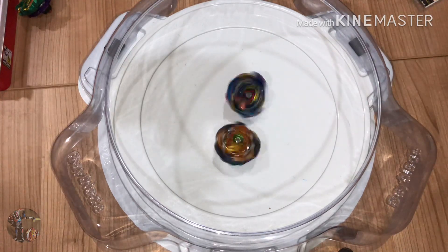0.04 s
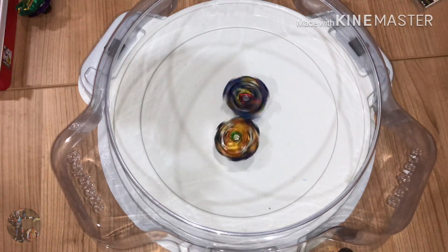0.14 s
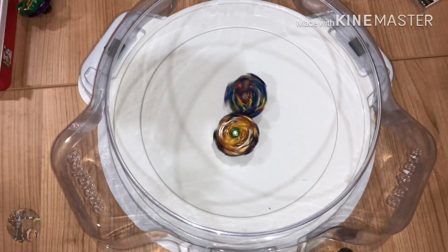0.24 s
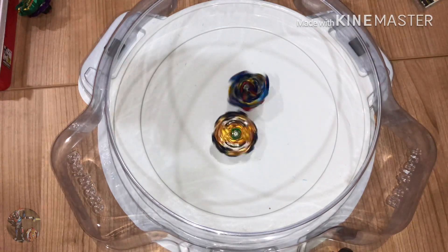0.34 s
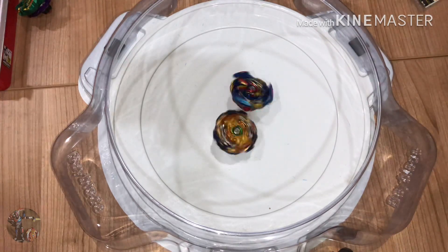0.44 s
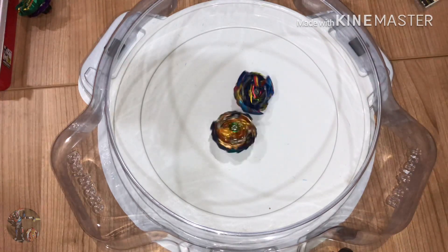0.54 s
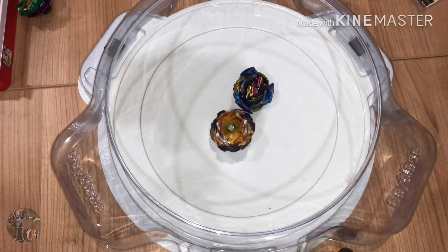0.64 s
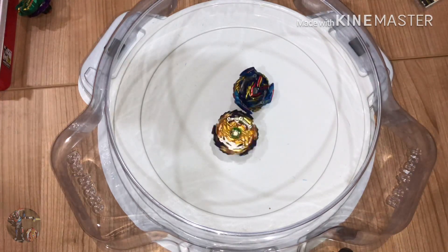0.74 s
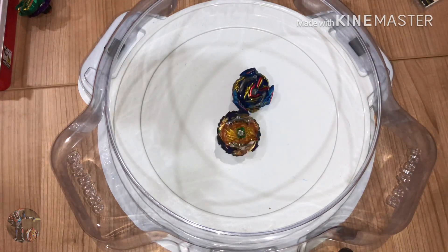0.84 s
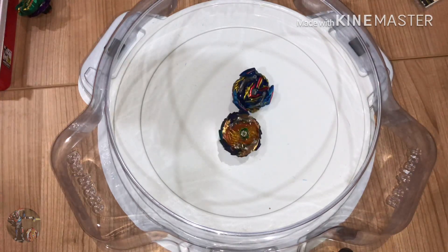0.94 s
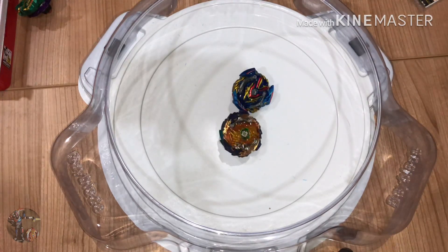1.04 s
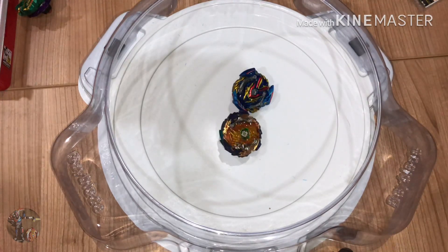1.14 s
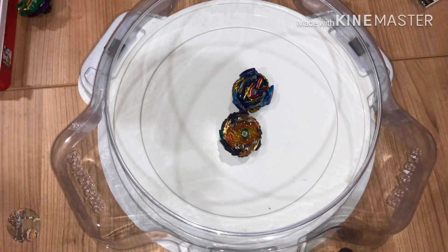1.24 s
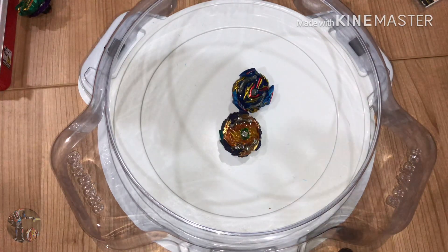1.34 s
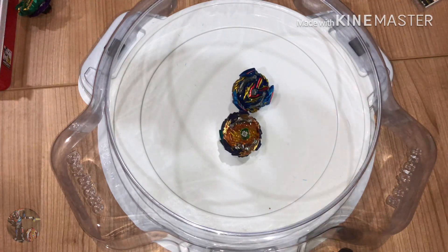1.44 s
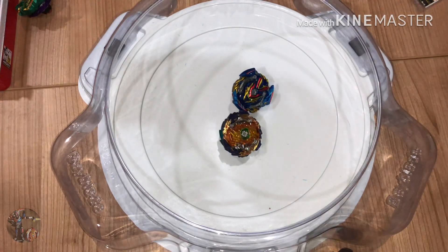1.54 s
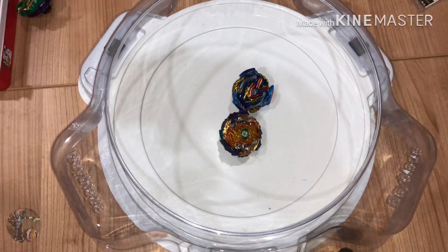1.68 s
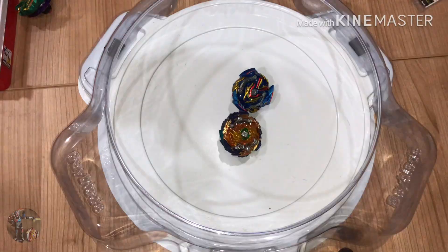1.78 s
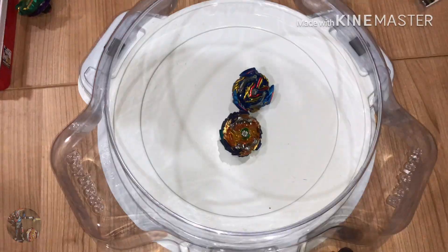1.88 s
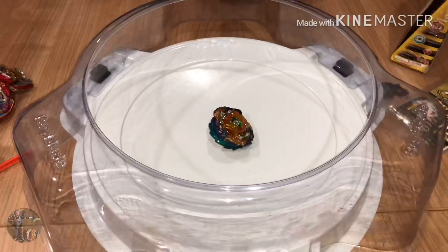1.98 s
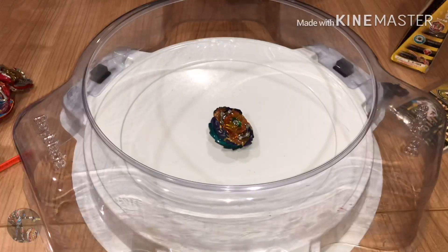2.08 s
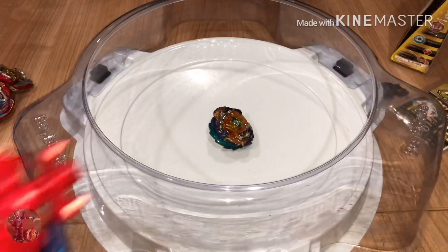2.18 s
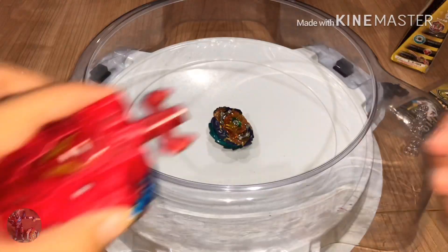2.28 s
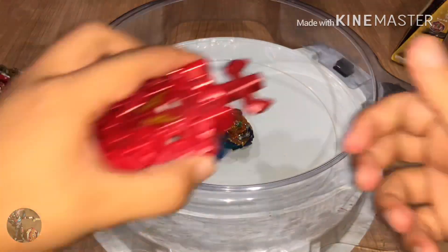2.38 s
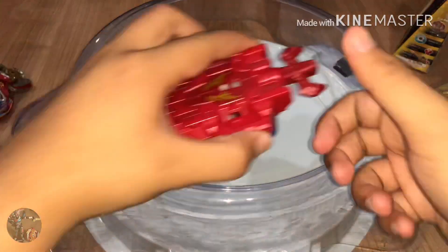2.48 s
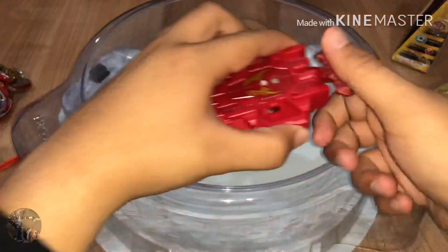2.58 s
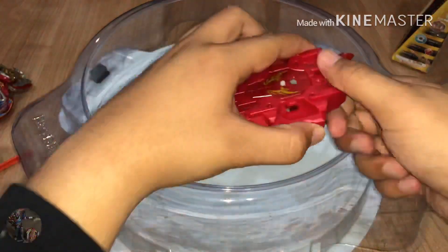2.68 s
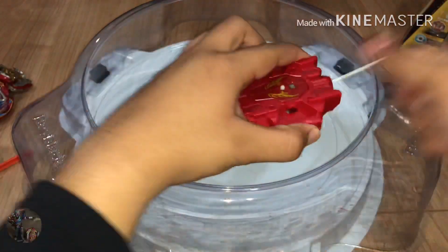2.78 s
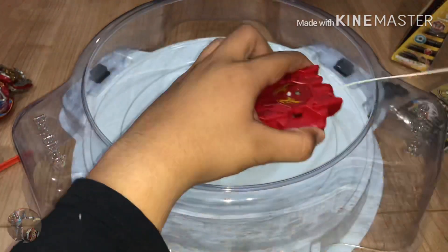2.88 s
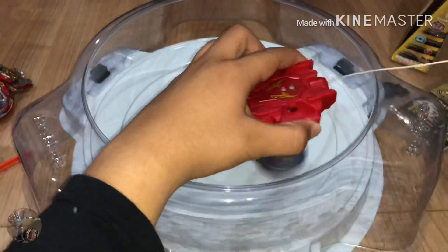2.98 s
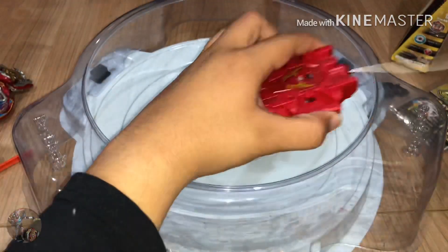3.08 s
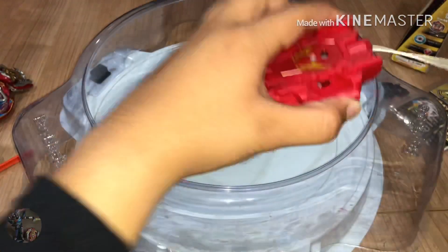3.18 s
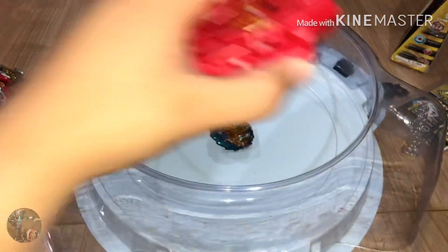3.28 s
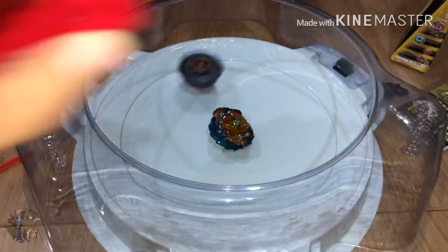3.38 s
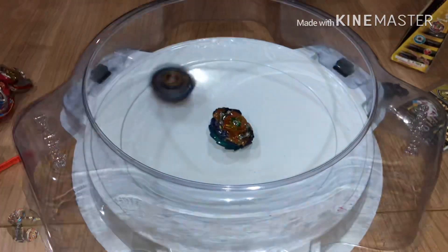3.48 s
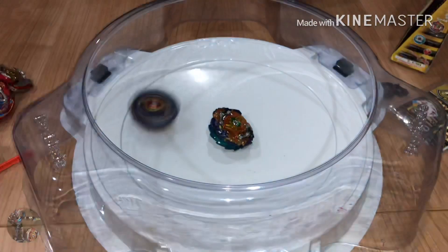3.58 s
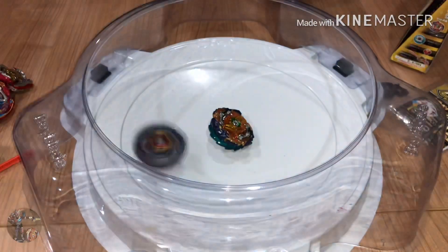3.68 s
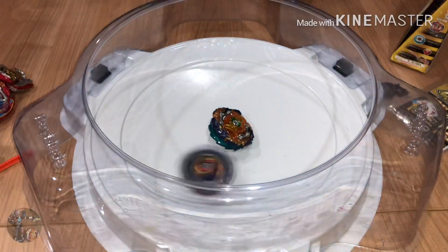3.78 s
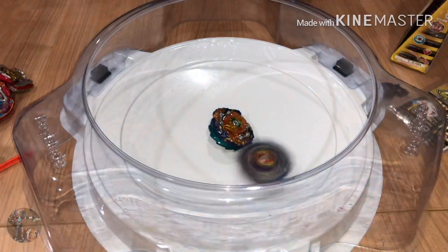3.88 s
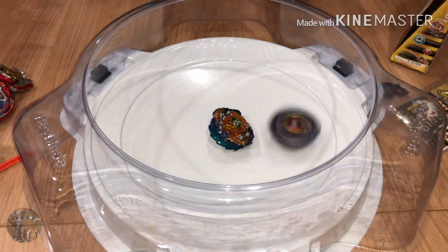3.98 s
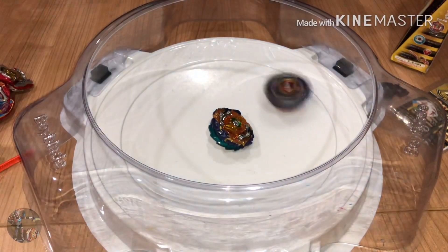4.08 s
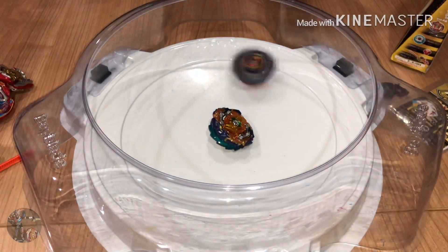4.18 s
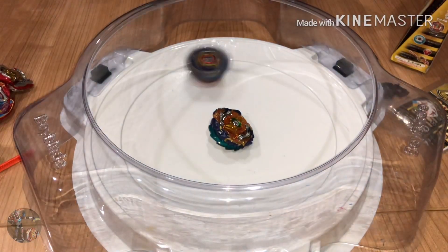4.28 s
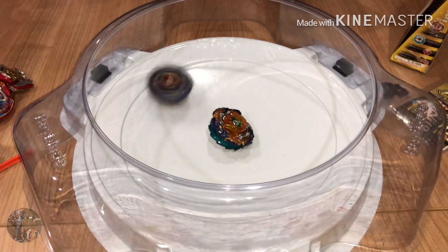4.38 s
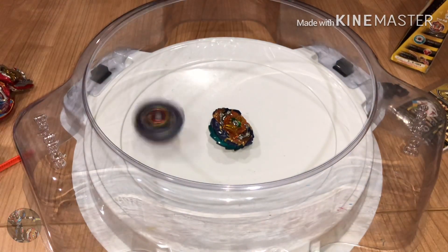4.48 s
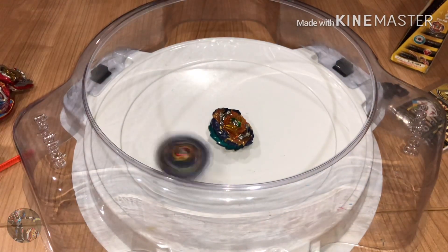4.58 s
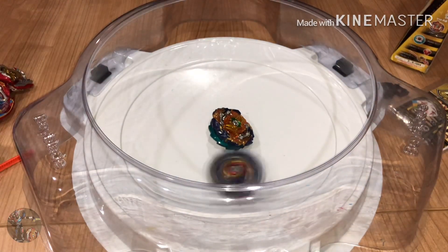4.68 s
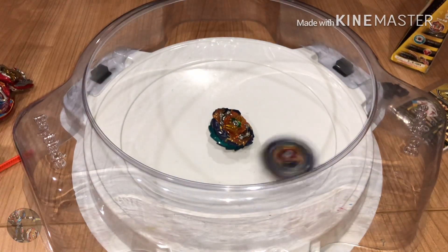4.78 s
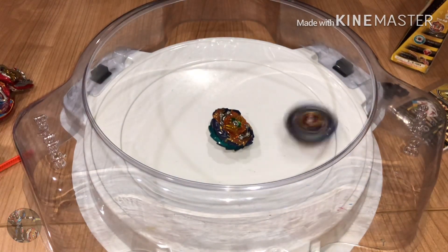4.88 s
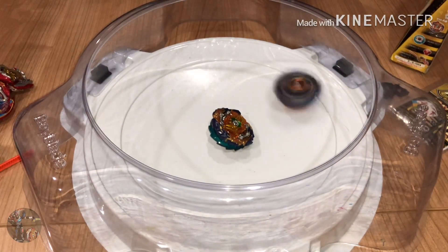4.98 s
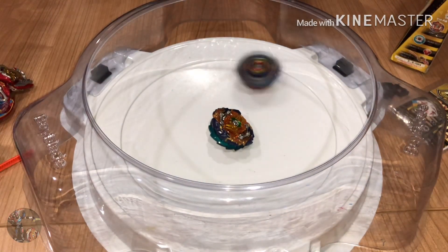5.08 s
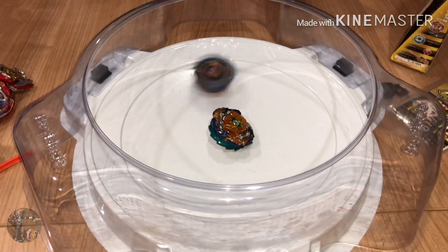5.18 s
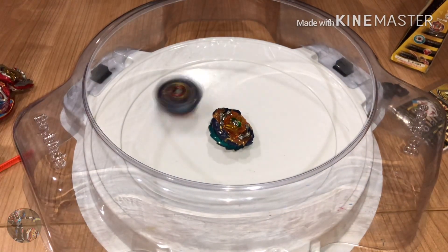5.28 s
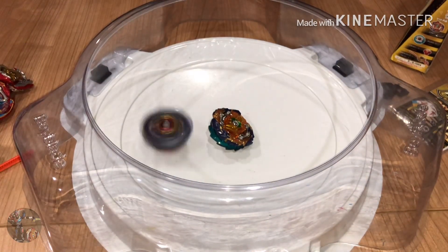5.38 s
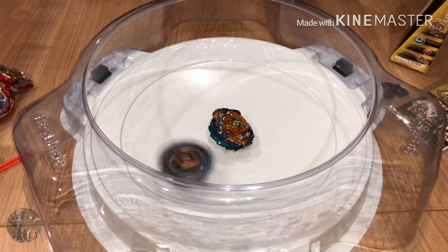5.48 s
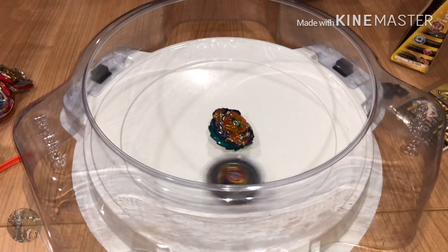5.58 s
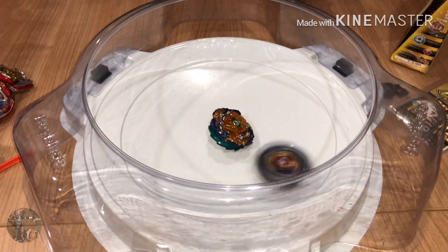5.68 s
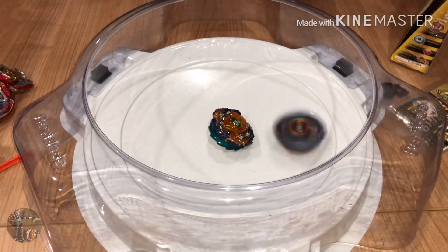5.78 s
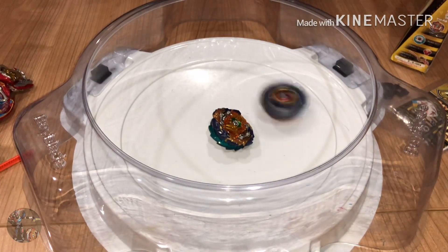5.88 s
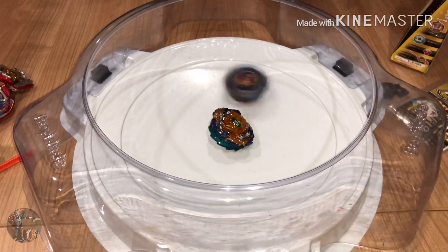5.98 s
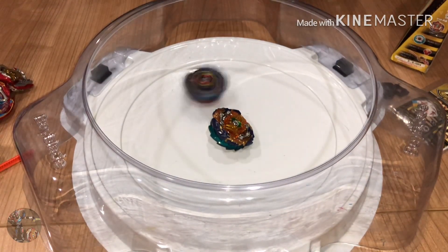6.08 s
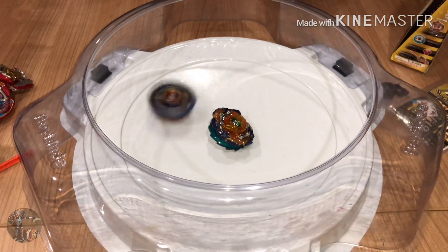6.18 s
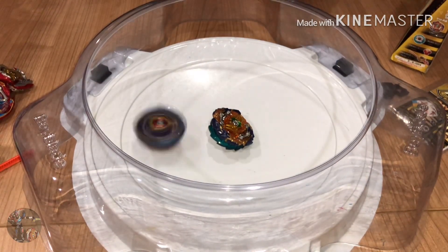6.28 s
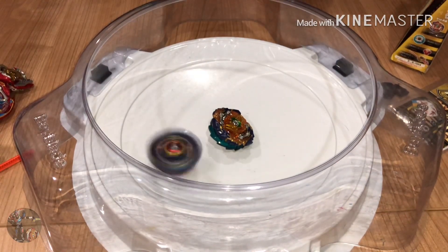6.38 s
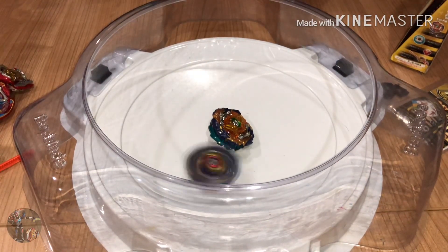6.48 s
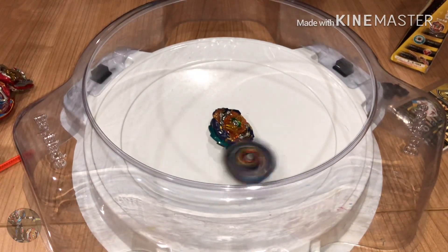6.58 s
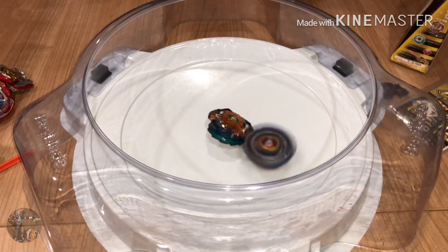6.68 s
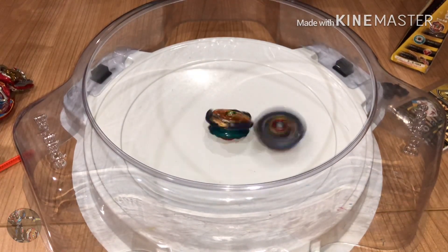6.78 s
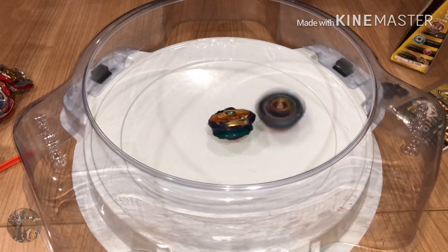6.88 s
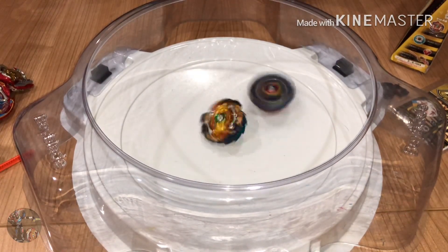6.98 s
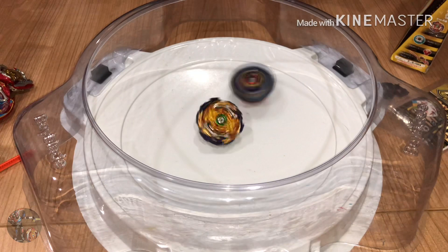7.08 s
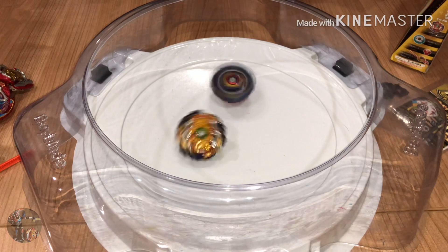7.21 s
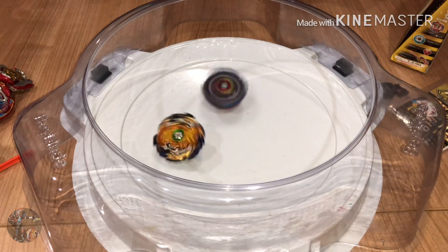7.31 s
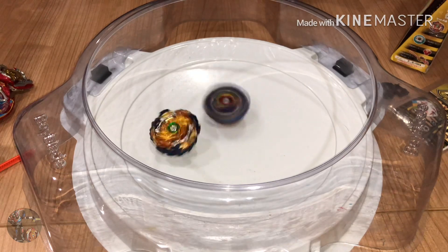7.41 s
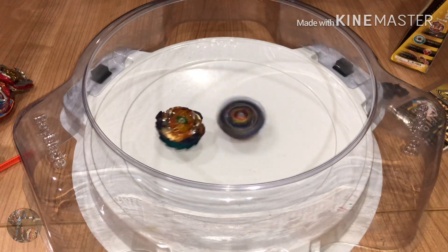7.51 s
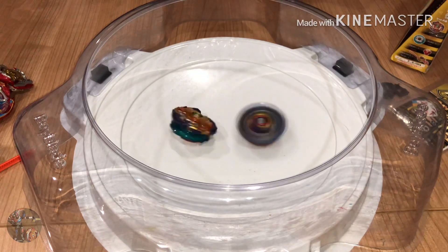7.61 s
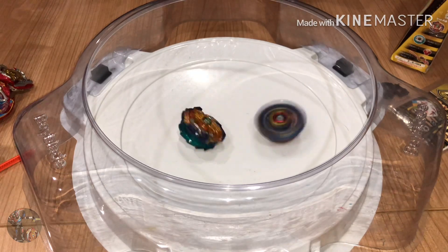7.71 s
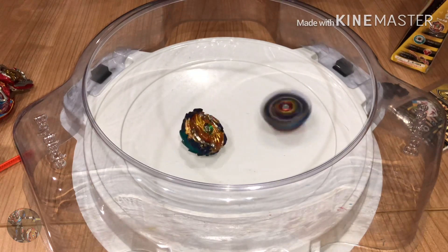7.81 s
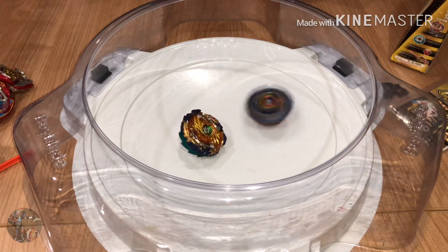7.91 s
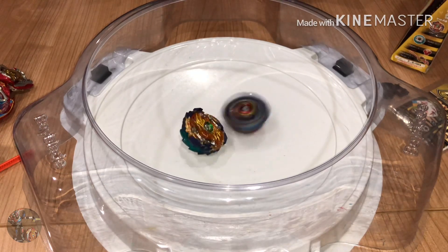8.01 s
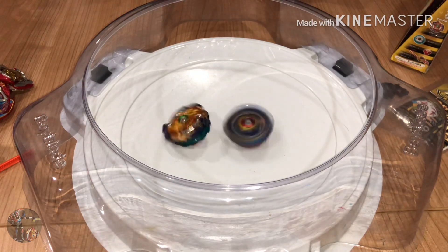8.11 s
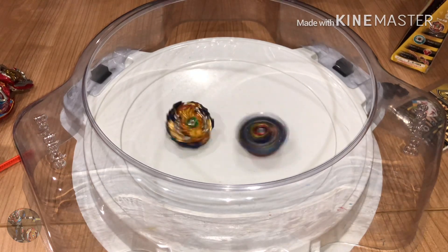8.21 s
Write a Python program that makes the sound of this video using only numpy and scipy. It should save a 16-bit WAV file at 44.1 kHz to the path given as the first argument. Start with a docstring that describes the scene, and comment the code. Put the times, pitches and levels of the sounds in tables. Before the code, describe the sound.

Close microphone, small hard plastic arena under a clear dome. Dull clacks and rim rattle fade to stillness, with a short near-total gap. A toothed cord zips harshly through a launcher, then rattles back while a top bounces down. It drones round the bowl, grinding and swelling each lap, before bright metallic clashes, knocks and rolling rumble end the scene.

```python
"""Toy spinning tops in a plastic bowl under a clear dome, heard from close above.
Two tired tops clatter and roll to rest: blows excite dense noise modes and clear ringing modes.
After a short silence a ripcord launcher whirrs: tooth snaps drive coloured noise bursts.
A new top bounces in and circles: its spin sets a hum, and each turn of the tip drums, grinds and scrapes.
It then clashes with the top lying in the middle, over rolling rumble, rattle and quiet room noise."""
import sys
import numpy as np
from scipy import signal
from scipy.fft import rfft, irfft, next_fast_len
from scipy.io import wavfile
from scipy.ndimage import map_coordinates

SR = 44100
rng = np.random.default_rng(int(sys.argv[2]) if len(sys.argv) > 2 else 0)


def unload_audio(sound):
    """Save the sound as a 16-bit wav file, at the path given as the first command line argument."""
    columns = np.transpose(np.atleast_2d(sound))
    # keep every value between -1 and 1, then stretch to whole-number steps
    steps = np.round(np.clip(columns, -1, 1) * 32767)
    wavfile.write(sys.argv[1], SR, steps.astype(np.int16))


N = 363825
TIME = np.arange(N) / SR

# Spectra of the parts of a blow: f/Hz, relative density/dB
CRACK_SPECTRUM = [(1060, -40), (1800, -5.5), (2520, -11), (3510, 3), (4060, -3), (4880, -3), (6470, -1),
                  (8060, -1.5), (10000, -6), (14900, -8.5), (16000, -18)]
KNOCK_SPECTRUM = [(380, -29.5), (650, -11.5), (1190, -0.5), (1370, -10.5), (1540, -3.5), (1790, -6),
                  (2380, -7), (3000, -7), (3900, -32), (6600, -120)]
THUD_SPECTRUM = [(41, -42), (70, -17), (224, -5.5), (371, 1.5), (575, -2.5), (792, -10), (900, -18.5),
                 (1170, -41.5), (1980, -120)]
TAIL_SPECTRUM = [(65, -46), (110, -8.5), (346, -13), (392, -6), (426, -15.5), (703, -19.5), (1040, -6),
                 (1400, -20.5), (1520, -13), (2350, -13.5), (2560, -16), (3800, -17.5), (8390, -15.5),
                 (15000, -25), (16000, -33.5)]
# Ringing modes of bowl and tops: f/Hz, relative level/dB, t60/s
BODY_MODES = [(394.2, 2, 0.55), (449, -1, 0.37), (1160, -8, .3), (1624, -8, 0.27), (2050, -6, 0.48),
              (2560, -12.5, .26), (2660, -6, .26), (3100, -3.5, .35), (3600, -11, .35), (4420, -8.5, .29),
              (5700, -8, .35), (6250, -10.5, .32), (6900, -7.5, .3), (7700, -10, 0.23), (8265, -11.5, 0.39),
              (10950, -12, 0.23)]
# Tops striking each other: t/s, rim crack level/dB, jolt passed to the bowl level/dB
CLASHES = [(0.001, -25, -29.5), (0.0678, -15.5, -28.5), (0.13, -23, -33), (0.1858, -27, -32),
           (0.206, -25.5, -36), (0.33, -18, -29.5), (0.3812, -22.5, -34.5), (0.441, -24.5, -33),
           (0.4728, -29, -42), (0.6538, -28, -36), (0.6972, -28, -45), (0.7809, -43, -61),
           (0.8056, -37.5, -56), (0.9239, -40, -58), (6.7221, -24.5, -49), (6.7423, -27, -36),
           (6.7539, -14, -31), (6.7858, -28, -33), (6.845, -21.5, -20.5), (6.8516, -9.5, -20.5),
           (7.0083, -33, -46), (7.031, -13, -28), (7.076, -11.5, -20), (7.2858, -7.5, -16.5),
           (7.583, -34, -50), (7.594, -34, -54), (7.707, -32, -39), (7.76, -39, -47), (8.1726, -7, -16)]
# Tumbling top knocking on plastic: t/s, level/dB, pitch of the spot hit f/Hz
KNOCKS = [(0.286, -31.5, 1100), (0.332, -28, 1110), (0.349, -35, 933), (0.699, -36, 1180),
          (0.807, -43, 1026), (0.922, -42, 1110), (1.0069, -46.5, 1470), (1.0905, -47, 2650),
          (1.108, -47, 2470), (6.883, -26, 2080), (6.91, -30, 1130), (7.056, -32, 930),
          (7.131, -26.5, 1590), (7.314, -20.5, 2560), (7.338, -23, 1210), (7.359, -23.5, 1510),
          (7.384, -27, 1018), (7.465, -32, 2170), (7.5708, -34, 1230), (7.586, -32, 1193),
          (7.695, -28, 2490), (7.709, -25, 2400), (7.7363, -32, 2440), (7.819, -34, 1125),
          (7.8691, -34, 2620), (7.951, -35.5, 1210), (8.1094, -33.5, 880), (8.175, -15, 2640),
          (8.186, -16.5, 2090)]
# Launched top landing and bouncing ever lower: t/s, level/dB
BOUNCES = [(3.094, -7), (3.274, -9.5), (3.4218, -9.5), (3.5371, -13), (3.614, -16.5), (3.6696, -20.5),
           (3.711, -22.5), (3.7391, -33.5)]
# Catch and pawl of the launcher: t/s, level/dB, pitch f/Hz
CLICKS = [(2.373, -47, 2320), (2.7632, -55, 1300), (3.1747, -22, 4100), (3.228, -16, 3600),
          (3.3417, -14, 3900), (3.349, -13, 3150), (3.3744, -10, 3930), (3.507, -14, 3570)]
# Parts set off by each contact, against its strength: crack/dB, shell knock/dB, bowl thud/dB, tail/dB
KNOCK_PARTS_DB = (-10, 0, -2.5, -11)
BOUNCE_PARTS_DB = (-2, -5.5, 0.5, -14.5)
SLAP_PARTS_DB = (-9, -10.5, -9, -21.5)
CLICK_PARTS_DB = (1.5, -10, -28, -27)
# Slow tops rolling on their rims, one list per round: t/s, relative rumble level/dB, relative rattle level/dB
ROLLING = [
    [(0.0, -35, -39.5), (0.48, -43, -36.5), (0.63, -53, -64), (0.75, -47, -47), (1.124, -58, -76),
     (1.94, -66, -88)],
    [(6.72, -42, -40), (6.92, -32.5, -46), (7.18, -44.5, -44), (7.346, -35.5, -42), (7.6, -43, -44),
     (7.734, -39, -37), (8.074, -44.5, -48), (8.25, -30, -31)],
]
# Rolling spectra: f/Hz, relative density/dB
RUMBLE_SPECTRUM = [(41, -37.5), (70, -5.5), (331, -2), (397, 0), (802, -15.5), (885, -3.5), (1030, -10),
                   (1210, -7), (1400, -20), (2520, -18), (3500, -25), (4550, -48.5), (7700, -120)]
RATTLE_SPECTRUM = [(880, -35.5), (1500, 4.5), (1870, -4), (2410, -7.5), (4330, -3.5), (6180, -6.5),
                   (7610, -20), (8400, -8.5), (8920, -23.5), (16000, -32)]
# Room noise and a faint narrow hiss: f/Hz, relative density/dB
ROOM_SPECTRUM = [(21, -40.5), (35, -5), (200, 0), (617, -14), (819, -13.5), (979, -16.5), (1270, -21.5),
                 (2340, -24.5), (5590, -30.5), (7230, -29), (9580, -34.5), (14800, -37), (16000, -33)]
WHINE_SPECTRUM = [(6600, -25.5), (7250, -3), (7900, -31)]
# Overall level, with the silence between the rounds: t/s, level/dB
PAUSE = [(1.86, -1.5), (1.945, -13), (1.955, -62), (2.012, -66), (2.02, -13), (2.08, -3.5)]
# Hands moving the launcher: t/s, relative rustle level/dB
HANDLING = [(2.05, -70), (2.16, -56.5), (2.32, -76), (2.4, -58), (2.72, -68.5), (2.82, -59)]
# Handling rustle, launcher housing on the pull, and as the cord runs back: f/Hz, relative density/dB
RUSTLE_SPECTRUM = [(130, -2), (260, 2), (600, -5), (2400, -5.5), (5000, -13.5), (15000, -19)]
PULL_SPECTRUM = [(600, -22.5), (900, -15), (1200, -6), (1600, -4), (2000, -6), (2400, -5.5), (2850, -10.5),
                 (3500, -0.5), (4800, -11.5), (6300, -7), (7500, -11.5), (10000, -14.5), (15500, -22.5)]
RECOIL_SPECTRUM = [(600, -35), (1100, -8), (1600, -1), (2700, -7.5), (3300, -2.5), (3800, -0.5),
                   (4700, -8.5), (7000, -10), (10000, -12.5), (15500, -23)]
# Grip of the circling tip on the bowl: t/s, pressure level/dB, extra grinding level/dB, roughness/0-1
TIP = [(3.8, 0, -2, 0.65), (4.05, 0, -1.5, 0.08), (4.35, 0, -2, 0.35), (4.48, -1.5, -2, 0.15),
       (4.6, 0.5, 2, 0.5), (4.9, 1, -1, 0.04), (5.2, 0.5, -2, 0.05), (5.5, -1, 0, 0.12),
       (5.85, -2, -1, 0.03), (6.05, 1, -1, 0.58), (6.32, 1.5, -1.5, 0.47), (6.43, -8, -1, 0.36),
       (6.57, 0.5, -2, 0.6), (6.67, -9, 0, 0.56)]
# Hum partials: multiple of the spin/1, relative level/dB
HUM = [(1, -18), (2, -0.5), (3, -3.5), (4, -0.5), (5, -7), (6, -0.5), (7, -2), (8, 1), (9, -1.5), (10, -7),
       (11, -6.5), (12, -8)]
# Tip spectra, the last a resonance of the rubbing tip: f/Hz, relative density/dB
DRUM_SPECTRUM = [(90, -12.5), (180, -10), (300, -9.5), (420, -2), (560, -11.5), (750, -16.5)]
GRIND_SPECTRUM = [(380, -19), (650, -5.5), (773, -3), (1180, 0), (1380, -9.5), (1570, -2.5), (1880, -6.5),
                  (3200, -13), (4160, -18.5), (7040, -120)]
SCRAPE_SPECTRUM = [(2200, -12), (3200, -1), (5000, -1), (7000, -7), (9500, -11.5), (12000, -15.5),
                   (16000, -22)]
SQUEAK_SPECTRUM = [(8200, -14), (8750, -2), (9400, -17)]

NEW_ROUND_S = 1.98
FAST_CLASHES_S = 6.6  # from here the fast top strikes the other, metal on metal
# the fast top glances off and presses less on the bowl
CLASH_KNOCK_DB, CLASH_THUD_DB, GLANCING_THUD_DB = -6.5, 0.5, -5
SLAP_AFTER_S = 0.009  # a landing top tips over and its rim slaps down
SPOT_HZ, SPOT_SPREAD_OCTAVES = 1147, 0.12  # usual pitch of the bowl floor
RIM_SPOT_HZ = 2600  # centre pitch of a shell struck by the fast top
SOFT_BELOW_DB, SOFT_DULLING = -30, 0.6  # a gentler knock loses this many dB of crack and tail per dB
CLICK_BODY = 0.25  # a gentler click keeps this share of its lost level as knock of the housing
# light touches while tops roll, against their rattle
TOUCH_CRACK_DB, TOUCH_KNOCK_DB, TOUCH_SPREAD_DB = -6, -3, 2.5
# the ripcord speeds up and slows in one stroke, then runs back; levels precede the dome and output gain
PULL_PEAK_S, PULL_DB = 2.983, -8.8
PULL_HALF_S, PULL_FALL_DB = 0.1, 19  # this far from the peak it is this much quieter
RELEASE_S, RECOIL_DB, RECOIL_HOLD_S, RECOIL_FADE_DB_PER_S = 3.09, -18.5, 0.23, 45
CORD_HOME_S, CORD_STOP_DB_PER_S = 3.7, 400
TEETH_PER_S = 1100  # mean at the stroke peak; loudness goes with cord speed squared
# the launched top slows steadily; it first climbs the far wall, then again on every lap
SETTLED_S, SPIN_TURNS_PER_S, SPIN_LOSS_PER_S2 = 3.8, 56.4, 3.3
FAR_WALL_S, LAP_S = 4.266, 0.897
# the climb makes the tip bite harder
CLIMB_DRUM_DB, CLIMB_GRIND_DB, CLIMB_SCRAPE_DB, CLIMB_ROUGH = 1.5, -1.5, 4, 0.25
HUM_SLIP_TURNS = 0.011  # rms wander of the contact point; upper partials waver more
DRUM_DB, GRIND_DB, SCRAPE_DB = -32.7, -34.5, -45.7  # before pressure, climb and roughness
CUTOFF_HZ = 15900


def from_db(db):
    """Decibels to gain."""
    return 10 ** (np.asarray(db) / 20)


def rms_one(x):
    """Scale to unit rms."""
    return x / np.sqrt(np.mean(x ** 2) + 1e-20)


def curve(rows, axis=1):
    """One table column, joined by straight lines in time."""
    rows = np.array(rows)
    return np.interp(TIME, rows[:, 0], rows[:, axis])


def level(rows, axis=1):
    """A dB column as gain, fading quickly outside its span."""
    outside_s = np.maximum(np.maximum(rows[0][0] - TIME, TIME - rows[-1][0]), 0)
    return from_db(curve(rows, axis=axis)) * np.exp(-outside_s / 0.06)


def colour(x, spectrum):
    """Filter by a spectrum with skirts of 30 dB per octave; rms 1."""
    hz, db = np.transpose(spectrum)
    size = next_fast_len(len(x))
    bin_hz = np.arange(size // 2 + 1) * SR / size
    octave = np.log2(np.maximum(bin_hz, 1))
    skirt_octaves = np.abs(octave - np.clip(octave, np.log2(hz[0]), np.log2(hz[-1])))
    gain = from_db(np.interp(octave, np.log2(hz), db) - 30 * skirt_octaves)
    return rms_one(irfft(rfft(x, size) * gain, size)[:len(x)])


def noise(spectrum, size=N):
    """Coloured noise of rms 1."""
    return colour(rng.standard_normal(size), spectrum)


def drift(knots_per_s):
    """Smooth random wander of rms about 1 through random knots."""
    knots = rng.standard_normal(4096)
    coarse = map_coordinates(knots, [TIME[::16] * knots_per_s], order=3, mode="wrap")
    return rms_one(coarse).repeat(16)[:N]


def decay(t60_s, size):
    """An envelope that falls 60 dB in t60."""
    return from_db(-60 * np.arange(size) / SR / t60_s)


def add(out, s, sound):
    """Mix a sound in at a time."""
    start = int(np.clip(s * SR, 0, N - 1))
    out[start:start + len(sound)] += sound[:N - start]


def dome(x, wet_db, t60_s, size=16000):
    """Dense decaying reflections from the dome and the room, added to the direct sound."""
    echoes = rng.standard_normal(size) * decay(t60_s, size) * (1 - decay(0.062, size))
    reflected = signal.fftconvolve(x, echoes / np.linalg.norm(echoes))[:N]
    return x + from_db(wet_db) * reflected


def contacts():
    """Every blow as (t/s, crack/dB, knock/dB, thud/dB, tail/dB, pitch/Hz), by the rule of its kind."""
    def spot(hz):
        return hz * 2 ** (SPOT_SPREAD_OCTAVES * rng.standard_normal())
    hits = []
    for s, db, hz in KNOCKS:
        dull_db = SOFT_DULLING * min(db - SOFT_BELOW_DB, 0)
        parts_db = np.add(db, KNOCK_PARTS_DB) + [dull_db, 0, 0, dull_db]
        hits.append((s, *parts_db, hz))
    for s, crack_db, jolt_db in CLASHES:
        fast = s >= FAST_CLASHES_S
        thud_db, hz = (GLANCING_THUD_DB, RIM_SPOT_HZ) if fast else (CLASH_THUD_DB, SPOT_HZ)
        knock_db = (crack_db + jolt_db) / 2 + CLASH_KNOCK_DB
        hits.append((s, crack_db, knock_db, jolt_db + thud_db, jolt_db, spot(hz)))
    for s, db in BOUNCES:
        hits.append((s, *np.add(db, BOUNCE_PARTS_DB), spot(SPOT_HZ)))
        hits.append((s + SLAP_AFTER_S, *np.add(db, SLAP_PARTS_DB), spot(SPOT_HZ)))
    for s, db, hz in CLICKS:
        parts_db = np.add(db, CLICK_PARTS_DB) - [0, CLICK_BODY * db, 0, 0]
        hits.append((s, *parts_db, hz))
    return hits


def light_touches(count=22):
    """Rolling tops tap the bowl unevenly, following their rattle: (t/s, crack/dB, knock/dB, pitch/Hz)."""
    taps = []
    for rows in ROLLING:
        s, rumble_db, rattle_db = np.transpose(rows)
        times_s = s[0] + (s[-1] - s[0]) * (np.arange(count) + rng.random(count)) / count
        db = np.interp(times_s, s, rattle_db) + TOUCH_SPREAD_DB * rng.standard_normal(count)
        hz = SPOT_HZ * 2 ** rng.exponential(0.2, count).clip(0, 2)
        taps += zip(times_s, db + TOUCH_CRACK_DB, db + TOUCH_KNOCK_DB, hz)
    return taps


def struck(hits, spectrum, t60_s, rise_s, likeness, axis, size):
    """Dense modes set off by every blow: partly a common response, partly that of the spot hit."""
    out = np.zeros(N)
    common, spots = noise(spectrum, size=size), noise(spectrum, size=65536)
    envelope = decay(t60_s, size) * (1 - np.exp(-np.arange(size) / SR / rise_s))
    envelope_rms = np.sqrt(np.mean(envelope ** 2))
    starts = (rng.random(len(hits)) * (len(spots) - size)).astype(int)
    for blow, start in zip(hits, starts):
        own = spots[start:start + size]
        response = envelope * (np.sqrt(likeness) * common + np.sqrt(1 - likeness) * own)
        add(out, blow[0], from_db(blow[axis]) * rms_one(response) * envelope_rms)
    return out


def spot_ring(taps, t60_s, detune, size=4500):
    """The spot hit rings briefly with a close pair of modes."""
    out, t = np.zeros(N), np.arange(size) / SR
    envelope = decay(t60_s, size) * (1 - decay(0.012, size))
    for s, crack_db, knock_db, hz in taps:
        second_hz = hz * (1 + detune * rng.standard_normal())
        second = np.sin(2 * np.pi * (second_hz * t + rng.random()))
        pair = np.sin(2 * np.pi * hz * t) + .5 * second
        add(out, s, from_db(knock_db) * envelope * pair)
    return out


def body_ring(hits, spread_db, size=22000):
    """Each blow strikes the clear modes of bowl and tops with strengths of its own."""
    out, t = np.zeros(N), np.arange(size) / SR
    modes = np.array([from_db(db) * decay(t60_s, size) * np.sin(2 * np.pi * hz * t)
                      for hz, db, t60_s in BODY_MODES])
    for s, crack_db, knock_db, thud_db, tail_db, spot_hz in hits:
        strength = from_db(tail_db + spread_db * rng.standard_normal(len(modes)))
        add(out, s, (strength * rng.choice([-1, 1], len(modes))) @ modes)
    return out


def rim_ring(hits, t60_s, spread_db, count=48, size=10000):
    """The metal rims have many high modes; each round has its own pair of tops."""
    out, t = np.zeros(N), np.arange(size) / SR
    rims = []
    for pair in range(2):
        hz = rng.uniform(3000, 10200, (count, 1))
        rims.append(np.sin(2 * np.pi * hz * t) * decay(t60_s, size) / np.sqrt(count))
    for s, crack_db, *others in hits:
        strength = from_db(crack_db + spread_db * rng.standard_normal(count))
        add(out, s, (strength * rng.choice([-1, 1], count)) @ rims[int(s > NEW_ROUND_S)])
    return out


def blows():
    """Contacts excite a metallic crack, the knock of the shell, the thud of the bowl and a ringing tail."""
    hits = contacts()
    taps = [(s, crack_db, knock_db, hz) for s, crack_db, knock_db, thud_db, tail_db, hz in hits]
    taps += light_touches()
    crack = from_db(8.5) * struck(taps, CRACK_SPECTRUM, t60_s=0.022, rise_s=.0003, likeness=0.089,
                                  axis=1, size=3000)
    # metal on metal is a shorter contact, so its crack is brighter
    high_pass = signal.butter(1, 6500, "high", fs=SR, output="sos")
    hard = from_db(4.5) * signal.sosfilt(high_pass, crack)
    crack = np.where(TIME < FAST_CLASHES_S, crack, hard)
    knock = from_db(3.5) * struck(taps, KNOCK_SPECTRUM, t60_s=0.072, rise_s=0.00042, likeness=0.22,
                                  axis=2, size=5000)
    knock += from_db(2.5) * spot_ring(taps, t60_s=0.087, detune=0.094)
    thud = from_db(6.0) * struck(hits, THUD_SPECTRUM, t60_s=0.11, rise_s=0.0015, likeness=0.27,
                                 axis=3, size=8000)
    tail = from_db(1.5) * struck(hits, TAIL_SPECTRUM, t60_s=0.37, rise_s=0.002, likeness=0.5,
                                 axis=4, size=18000)
    # loose parts keep chattering inside the tail
    tail *= from_db(2.1 * drift(130))
    rims = rim_ring(hits, t60_s=0.2, spread_db=5.0)
    body = from_db(-10.5) * body_ring(hits, spread_db=2.5)
    sound = crack + knock + dome(thud, wet_db=-12, t60_s=0.32) + tail + body
    # the slow tops of the first round touch more softly: duller, with more rim ring
    low_pass = signal.butter(1, 12000, fs=SR, output="sos")
    soft = signal.sosfilt(low_pass, sound + from_db(-9) * rims)
    return np.where(TIME < NEW_ROUND_S, soft, sound + from_db(-14.5) * rims)


def rolling_tops(lumpy_db, grain_db, ticks_per_s, size=6000):
    """Toothed rims roll over the plastic: an uneven rumble, and small ticks that ring in the dome."""
    rumble = noise(RUMBLE_SPECTRUM) * rms_one(from_db(lumpy_db * drift(60)))
    ticks = (rng.random(N) < ticks_per_s / SR) * from_db(grain_db * rng.uniform(-1, 1, N))
    bursts = rng.standard_normal(N) * signal.fftconvolve(ticks, decay(0.016, size))[:N]
    rattle = colour(dome(bursts, wet_db=-7.0, t60_s=0.11, size=size), RATTLE_SPECTRUM)
    out = np.zeros(N)
    for rows in ROLLING:
        out += from_db(1.5) * level(rows, axis=1) * rumble
        out += from_db(-1.5) * level(rows, axis=2) * rattle
    return out


def room_noise():
    """Steady coloured noise with a faint, wavering narrow hiss."""
    whine_db = np.where(TIME < NEW_ROUND_S, -79, -73.5) + 2.5 * drift(18)
    return from_db(-56.5) * noise(ROOM_SPECTRUM) + noise(WHINE_SPECTRUM) * from_db(whine_db)


def cord_level():
    """Ratchet level in dB: the swell of the pull, then a recoil that holds, fades and stops."""
    pull_db = PULL_DB - PULL_FALL_DB * ((TIME - PULL_PEAK_S) / PULL_HALF_S) ** 2
    fade_s = np.maximum(TIME - RELEASE_S - RECOIL_HOLD_S, 0)
    stop_s = np.maximum(TIME - CORD_HOME_S, 0)
    recoil_db = RECOIL_DB - RECOIL_FADE_DB_PER_S * fade_s - CORD_STOP_DB_PER_S * stop_s
    return np.maximum(np.where(TIME < RELEASE_S, pull_db, recoil_db), -140)


def launcher(tooth_spread_db, rub_db, edge_hz):
    """Cord teeth snap through the gear and sound the plastic housing, on the pull, then running back."""
    cord_db = cord_level()
    rate_per_s = np.maximum(TEETH_PER_S * np.sqrt(from_db(cord_db - PULL_DB)), 150)
    teeth = np.cumsum(rate_per_s * (1 + .2 * drift(300))) / SR
    tooth_gain = from_db(tooth_spread_db * rng.uniform(-1.4, 1, N))
    snaps = np.diff(np.floor(teeth), prepend=0) * tooth_gain / np.sqrt(rate_per_s)
    # each snap is a short burst of rattling plastic
    bursts = rms_one(signal.fftconvolve(snaps, decay(0.0059, size=400))[:N])
    drive = (bursts + from_db(rub_db)) * rng.standard_normal(N) * from_db(2.0 * np.tanh(drift(170)))
    high_pass = signal.butter(2, edge_hz, "high", fs=SR, output="sos")
    pull = signal.sosfilt(high_pass, colour(drive, PULL_SPECTRUM))
    recoil = colour(drive, RECOIL_SPECTRUM)
    whirr = from_db(cord_db) * np.where(TIME < RELEASE_S, pull, recoil)
    rustle = level(HANDLING) * noise(RUSTLE_SPECTRUM) * from_db(2.9 * drift(49.64))
    return from_db(-0.8) * dome(whirr, wet_db=-13, t60_s=0.18) + from_db(4.0) * rustle


def spin_hum(turns, waver_db):
    """Partials locked to the spin; the bowl modes answer differently as the top travels round."""
    hum = np.zeros(N)
    for multiple, db in HUM:
        gain = from_db(db + waver_db * np.tanh(drift(5)))
        slip_turns = HUM_SLIP_TURNS * multiple * drift(14)
        hum += gain * np.sin(2 * np.pi * (round(multiple) * turns + rng.random() + slip_turns))
    return rms_one(hum)


def circling_top(scrape_s, drum_s, waver_db, uneven_db, bite_spread_db):
    """The off-centre tip digs in once a turn: the bowl hums and drums, the tip grinds, scrapes, squeaks."""
    speed = SPIN_TURNS_PER_S - SPIN_LOSS_PER_S2 * (TIME - SETTLED_S)
    turns = np.cumsum(speed * (1 + .003 * drift(7) + .0035 * drift(40))) / SR
    since_s = (turns % 1) / speed
    climb = (.5 + .5 * np.cos(2 * np.pi * (TIME - FAR_WALL_S) / LAP_S)) ** 2
    rough = np.clip(curve(TIP, axis=3) + CLIMB_ROUGH * climb, 0, 1)
    pressure = from_db(uneven_db * drift(45))
    push = pressure * (np.exp(-since_s / drum_s) + 0.4)
    rough_drum = colour(rng.standard_normal(N) * push, DRUM_SPECTRUM)
    # roughness trades the tonal hum for noise
    drum = from_db(1.36) * np.sqrt(1 - rough) * spin_hum(turns, waver_db) + np.sqrt(rough) * rough_drum
    grind = colour(rng.standard_normal(N) * push, GRIND_SPECTRUM)
    # every turn bites with a strength of its own
    strength = from_db(bite_spread_db * rng.standard_normal(size=1024))[turns.astype(int)]
    bite = strength * since_s / scrape_s * np.exp(-since_s / scrape_s)
    scrape = colour(rng.standard_normal(N) * bite * from_db(2.6 * drift(450)), SCRAPE_SPECTRUM)
    squeak = colour(rng.standard_normal(N) * bite, SQUEAK_SPECTRUM)
    squeak *= from_db(-13 + 6 * climb + 3.5 * drift(30))
    drum_db = DRUM_DB + CLIMB_DRUM_DB * climb
    grind_db = GRIND_DB + curve(TIP, axis=2) + CLIMB_GRIND_DB * climb
    scrape_db = SCRAPE_DB + CLIMB_SCRAPE_DB * climb + 2.1 * (rough - .4)
    rubbing = dome(from_db(scrape_db) * (scrape + squeak), wet_db=-4.5, t60_s=.3)
    return level(TIP) * (from_db(drum_db) * drum + from_db(grind_db) * grind + rubbing)


def scene():
    """Both rounds over a quiet room, with a moment of silence between them."""
    mix = blows() + rolling_tops(lumpy_db=3.5, grain_db=9.0, ticks_per_s=170) + room_noise()
    mix += launcher(tooth_spread_db=6.5, rub_db=-1, edge_hz=820)
    mix += circling_top(scrape_s=.0025, drum_s=0.0085, waver_db=3.5, uneven_db=0.97, bite_spread_db=1.7)
    return (mix * from_db(curve(PAUSE)))[None]


def record(dry):
    """The loudest peaks overload smoothly; the deepest bass and the top are cut."""
    clipped = dry / (1 + (dry / .95) ** 12) ** (1 / 12)
    thinned = signal.sosfilt(signal.butter(2, 40, "high", fs=SR, output="sos"), clipped)
    return signal.sosfilt(signal.ellip(10, .1, 80, CUTOFF_HZ, fs=SR, output="sos"), thinned)


dry = scene()
out = record(dry)
unload_audio(out)
```